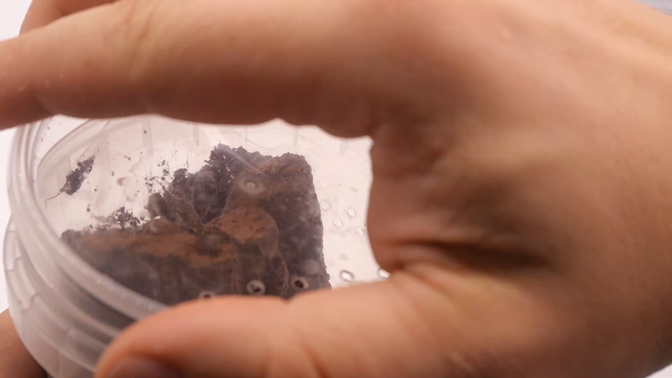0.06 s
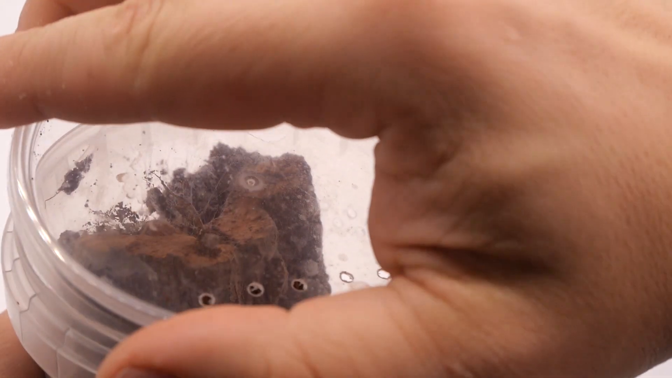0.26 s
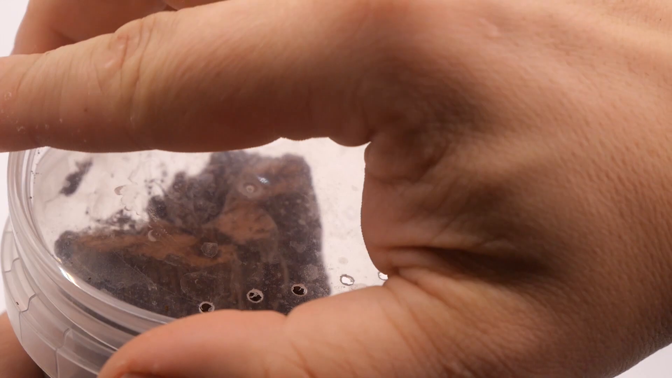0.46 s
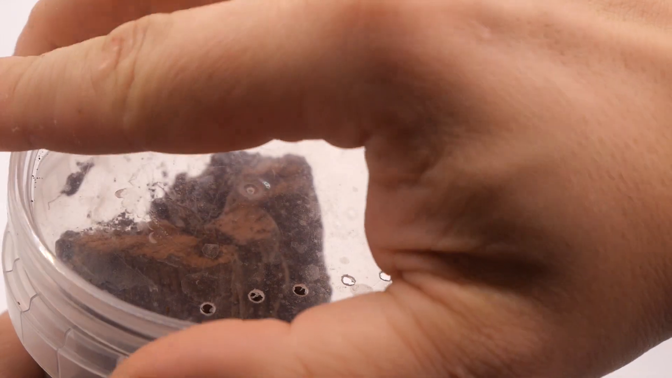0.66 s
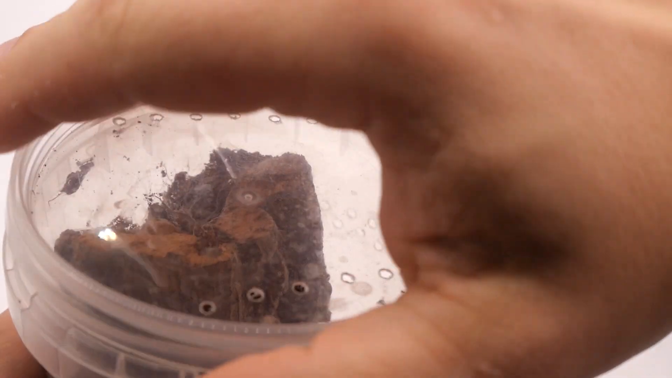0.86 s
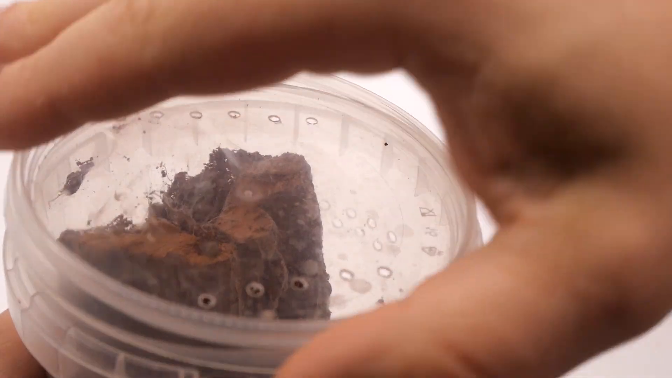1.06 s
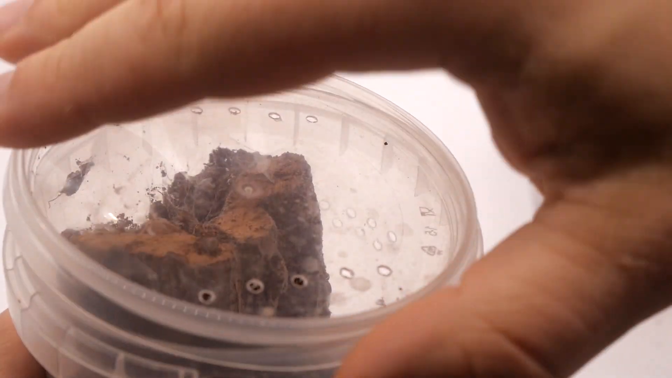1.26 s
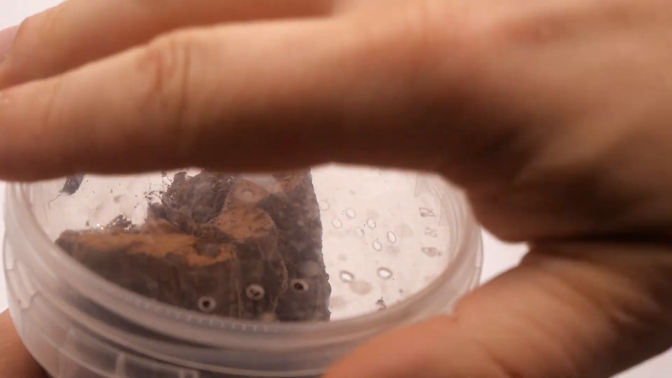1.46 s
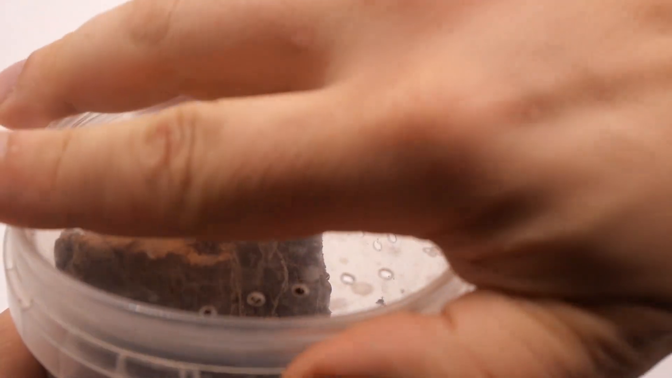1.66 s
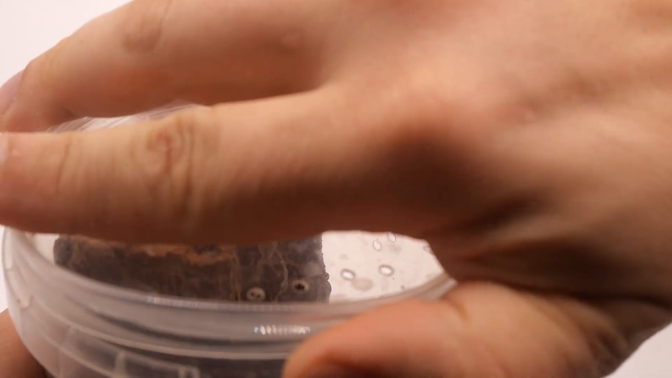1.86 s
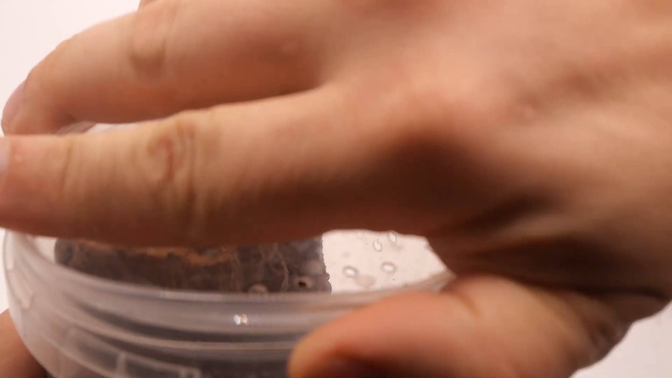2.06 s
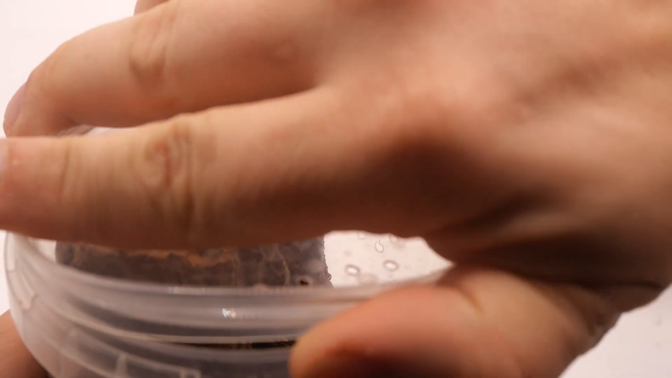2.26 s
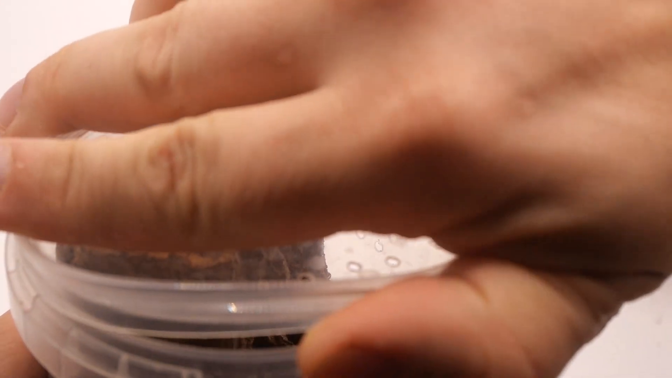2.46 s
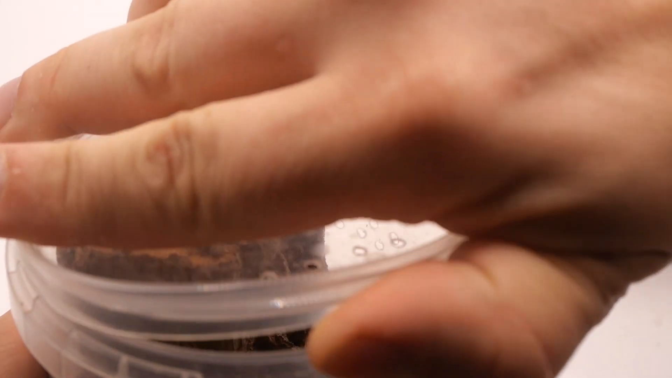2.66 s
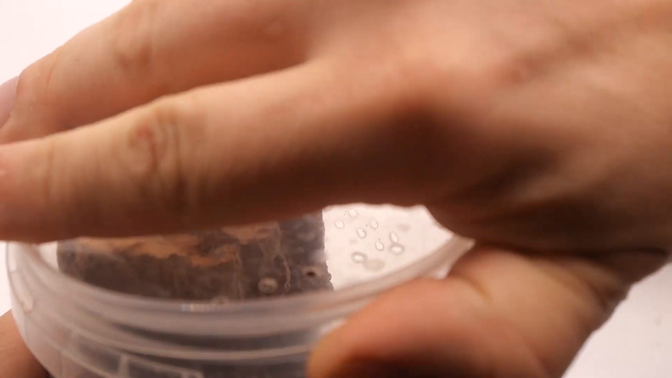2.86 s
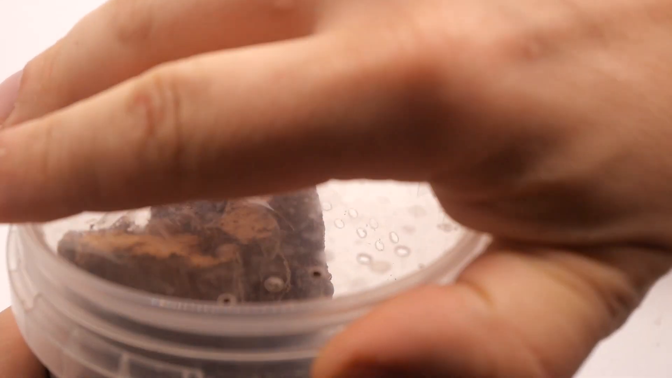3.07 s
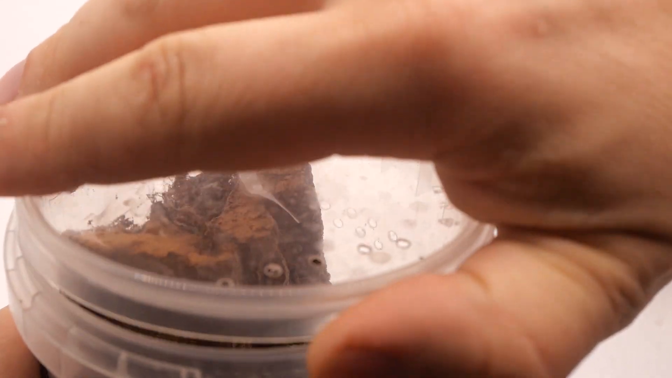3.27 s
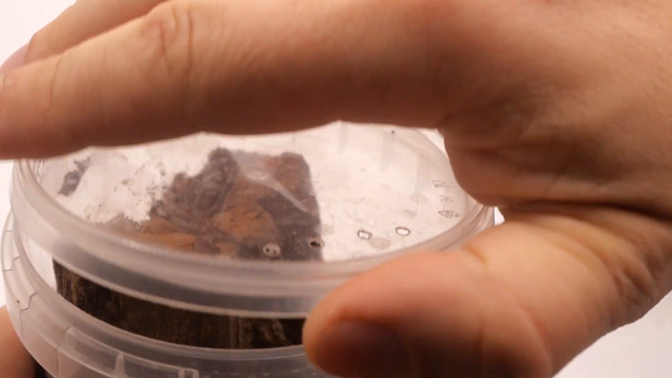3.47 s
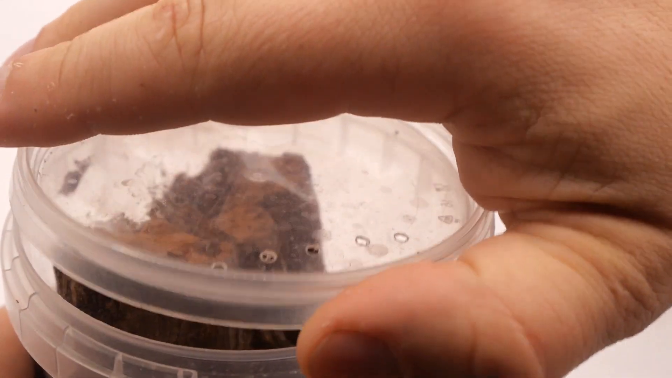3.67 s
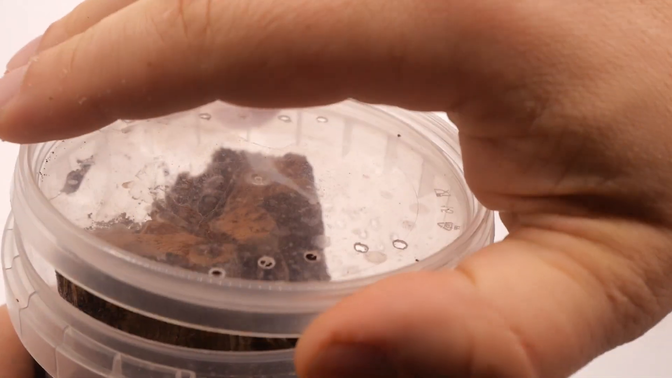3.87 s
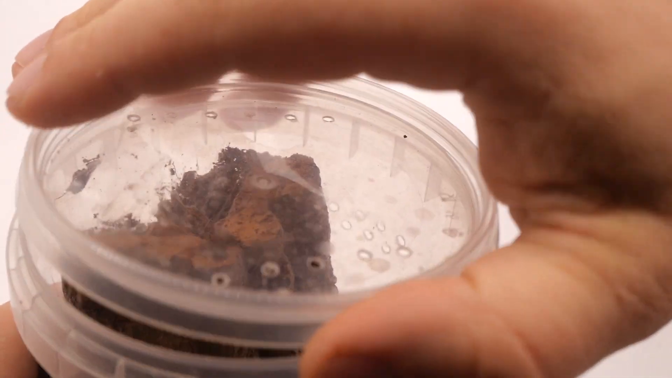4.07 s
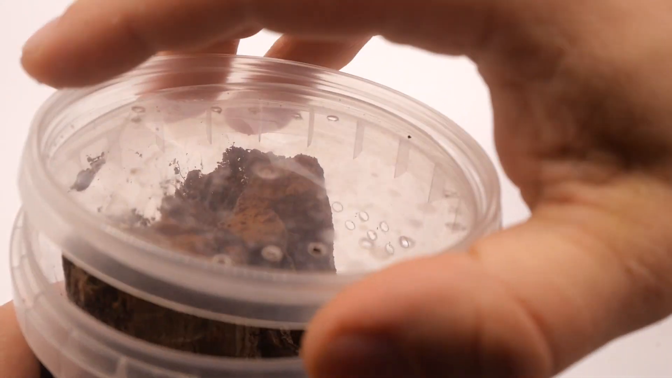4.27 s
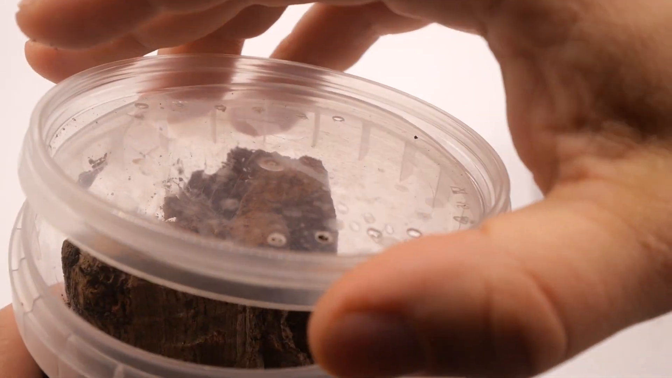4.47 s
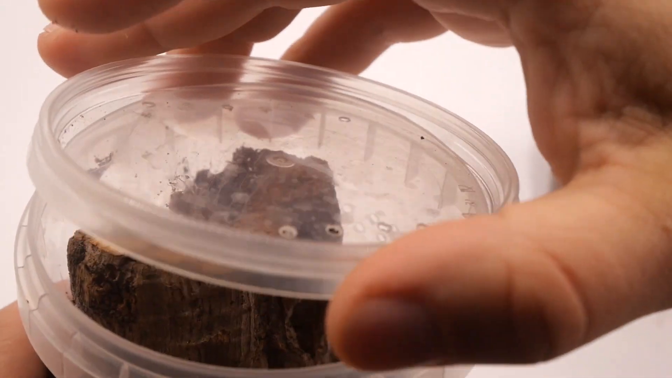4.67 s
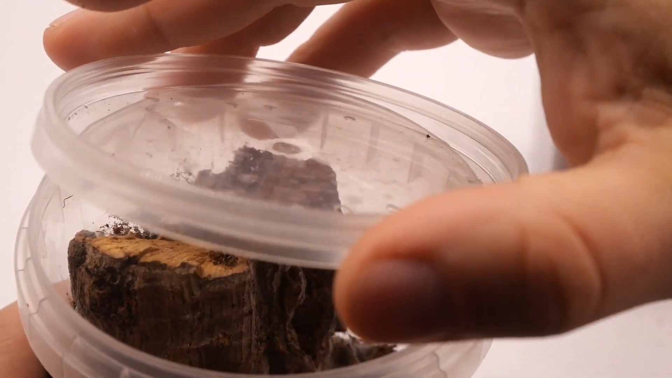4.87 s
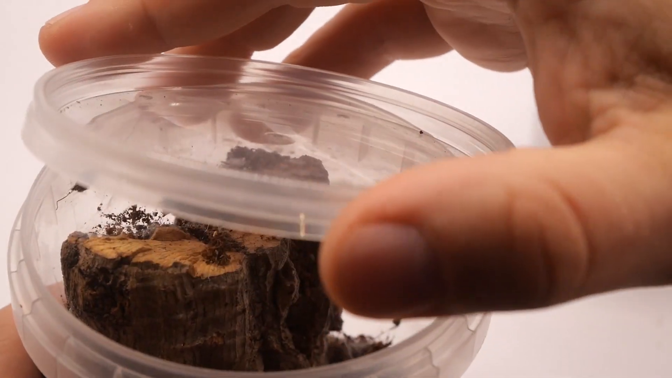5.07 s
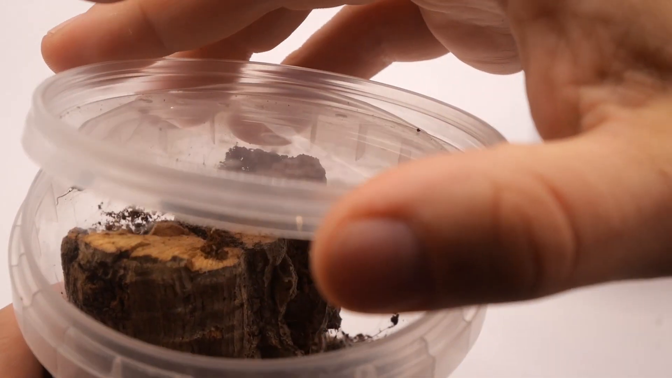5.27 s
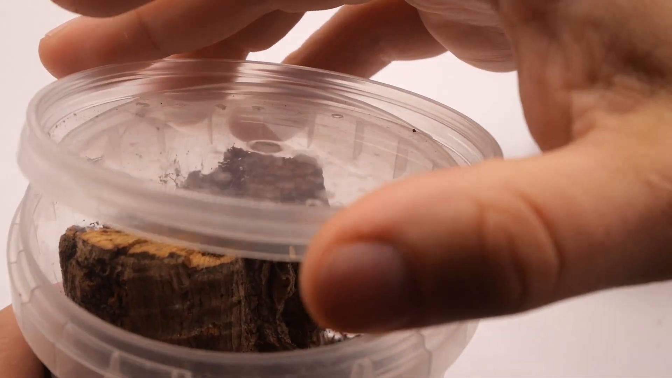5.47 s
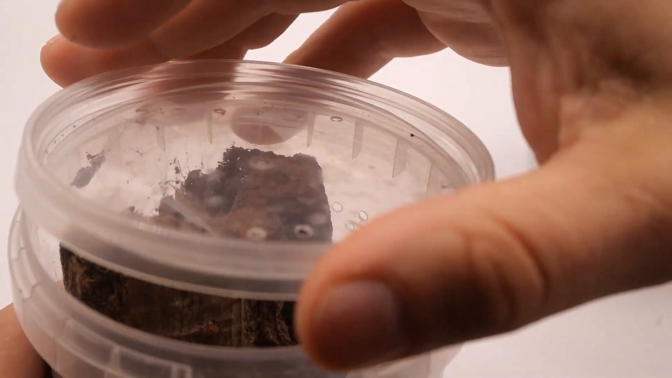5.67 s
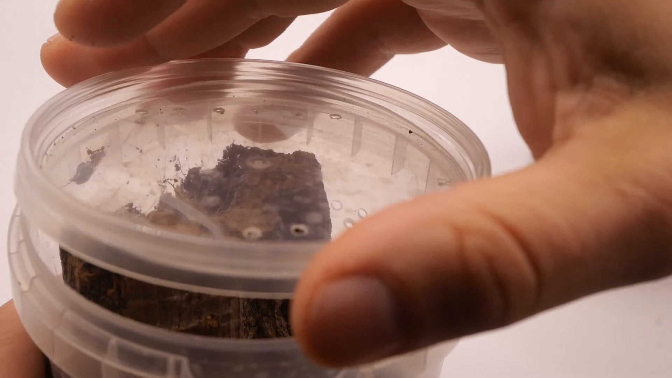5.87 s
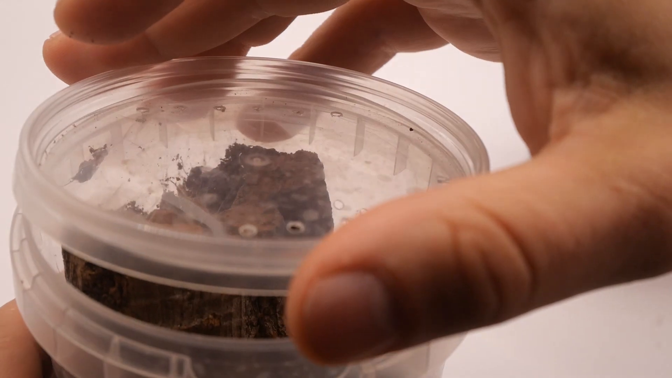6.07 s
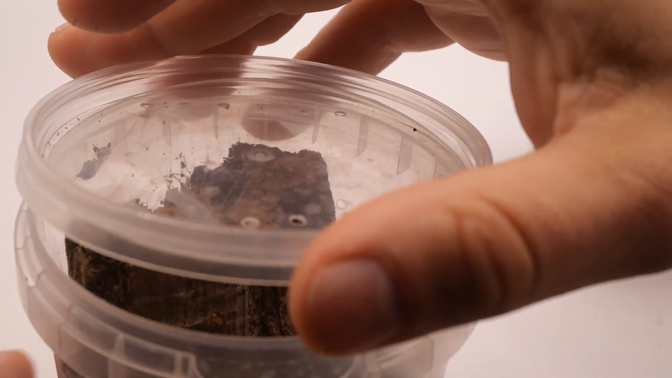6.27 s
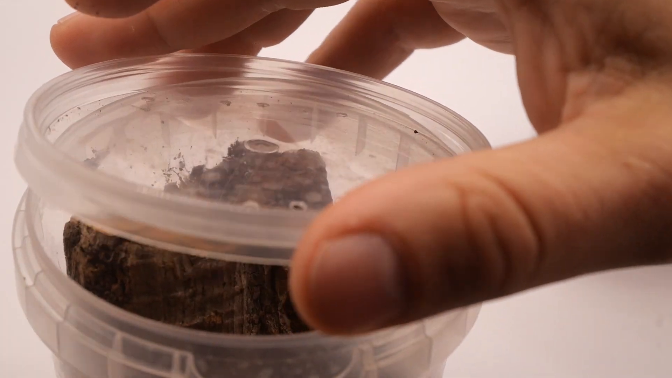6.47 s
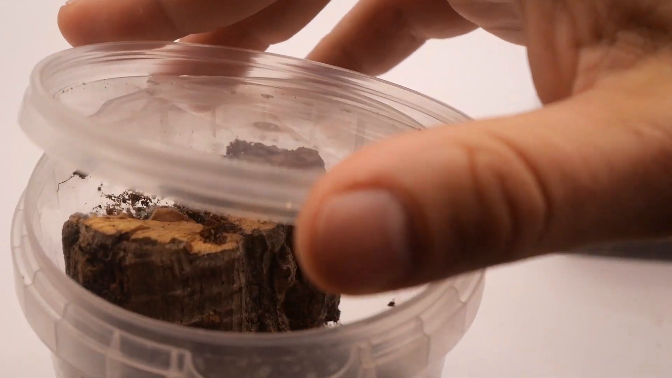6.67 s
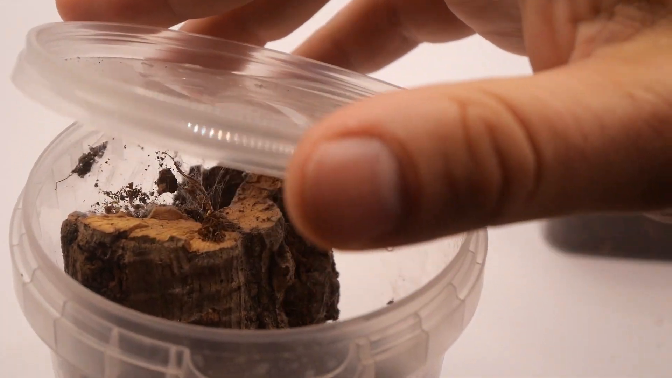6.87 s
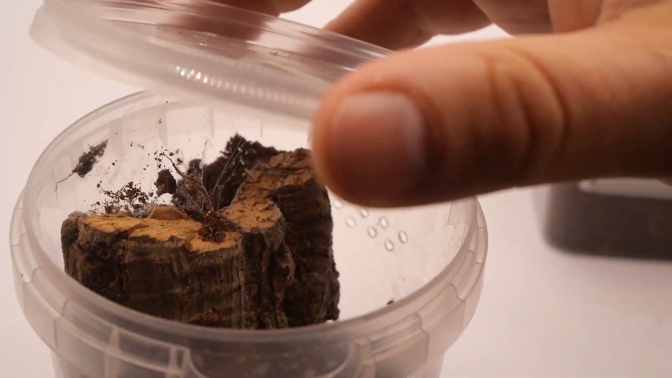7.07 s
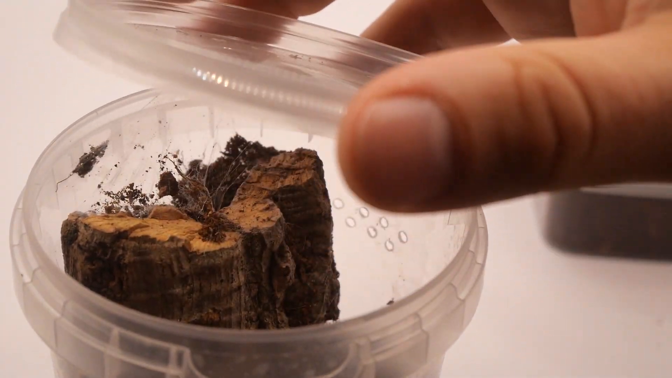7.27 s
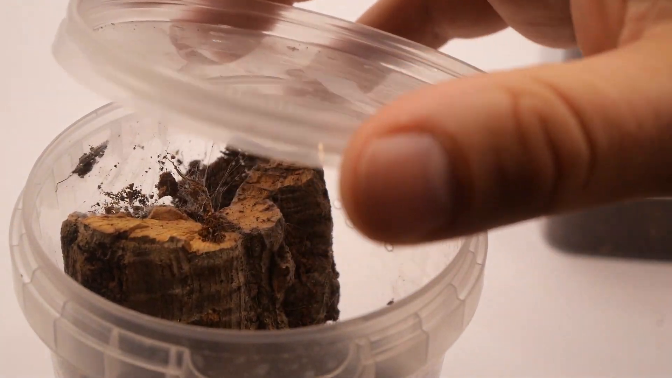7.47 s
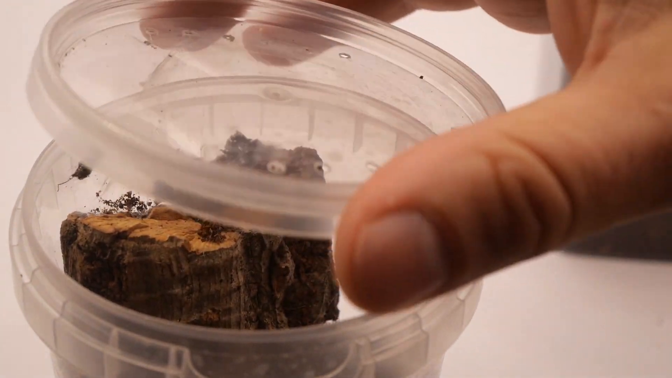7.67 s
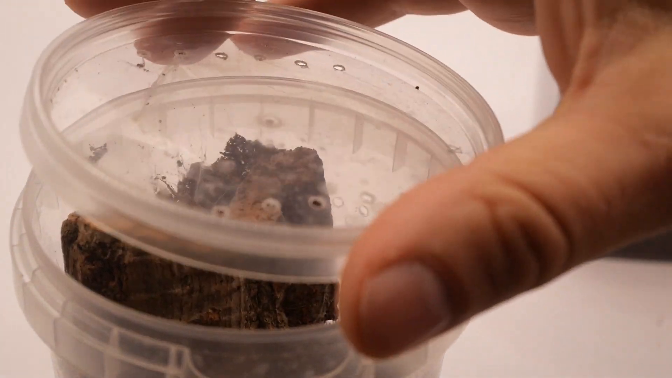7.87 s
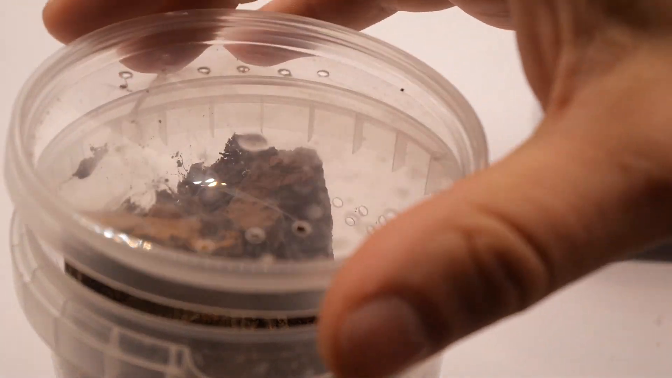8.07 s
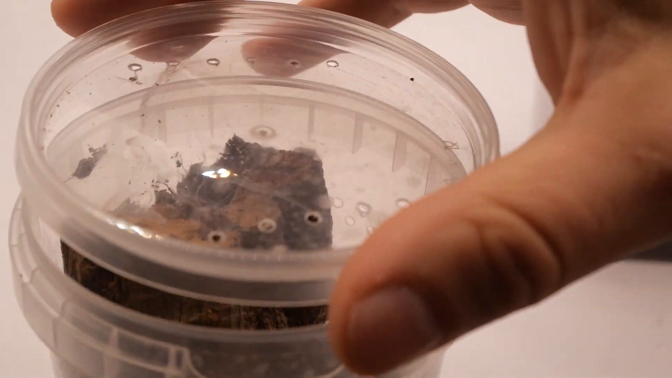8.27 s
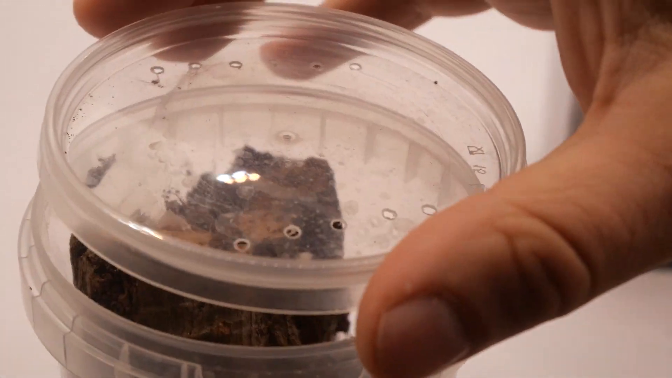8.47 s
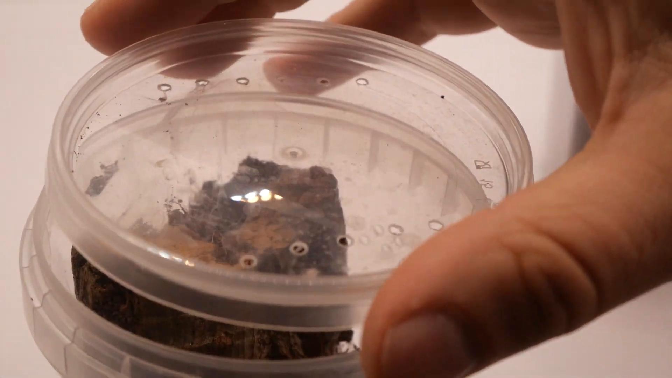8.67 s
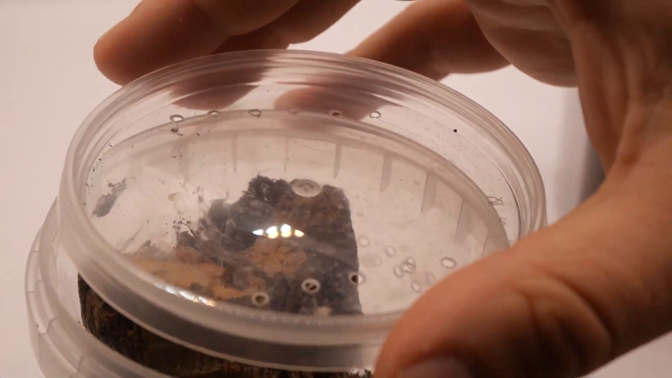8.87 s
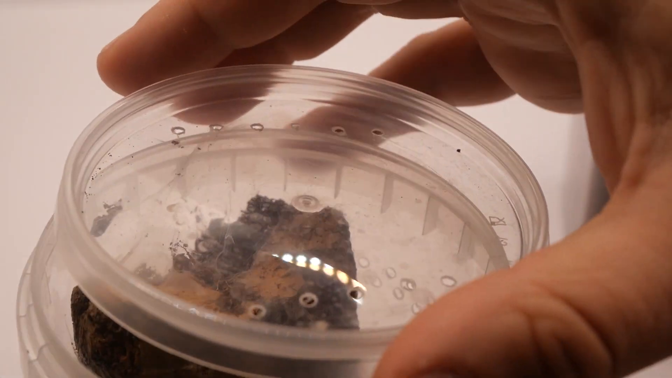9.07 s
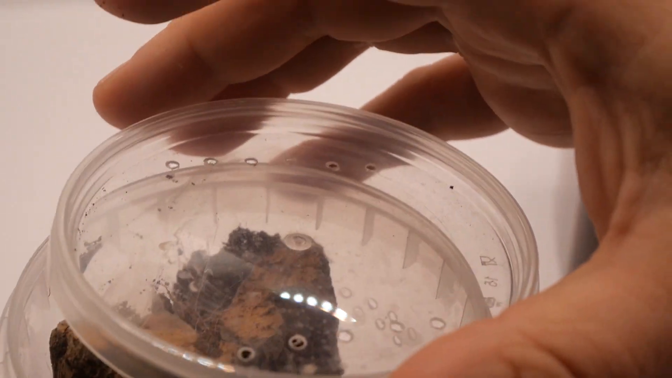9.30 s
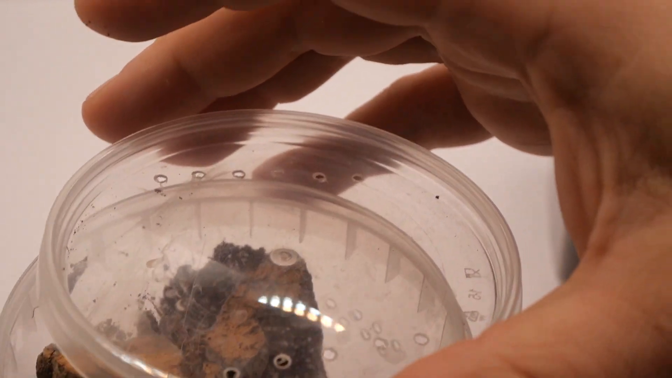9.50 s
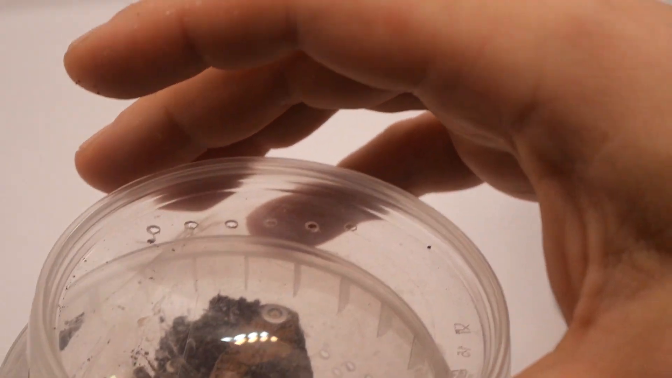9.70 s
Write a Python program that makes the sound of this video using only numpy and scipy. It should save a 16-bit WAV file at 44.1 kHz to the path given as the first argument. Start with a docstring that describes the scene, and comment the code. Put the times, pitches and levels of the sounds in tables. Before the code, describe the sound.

Very close to the microphone in a quiet room, fingers slide and knock on a thin plastic lid with faint rubs and hollow pops. A louder pop comes before the rim breaks free in a rapid cluster of sharp, bright snaps. Afterwards there are only light scuffs, small ticks, low bumps and rustles of the hands.

```python
"""Prising a lid off a cup

A thin plastic lid is prised off a small cup, close to a microphone in a quiet room.
Fingers knock and rub the lid: short damped modes over stick-slip noise exciting its resonances.
Its rim slips over the cup's bead in bursts of sharp snaps, each a swelling and dying set of tones,
and every shift of the hands sways the cup with a low bump and a rustle of filtered noise."""
import sys
import numpy as np
from scipy import signal
from scipy.fft import rfft, irfft, next_fast_len
from scipy.io import wavfile
from scipy.ndimage import map_coordinates

SR = 44100
rng = np.random.default_rng(int(sys.argv[2]) if len(sys.argv) > 2 else 0)


def wav_out(sig):
    """Save sig, one row per channel (or a flat mono array), as 16-bit PCM at SR to the path in sys.argv[1]."""
    wavfile.write(sys.argv[1], SR, np.round(np.clip(np.atleast_2d(sig).T, -1, 1) * 32767).astype(np.int16))


N = 429534

# fingers sliding on the plastic, one continuous curve of effort written in four lists: # t/s, relative level of
# the lid's ring/dB, relative level of the dull skin rub/dB
RUBBING = [
    [(0.0, -60, -61), (0.39, -60, -50), (0.846, -64, -60), (1.004, -59, -52.5), (1.362, -62, -59.5),
     (1.786, -63, -52.5), (1.95, -57.5, -50)],
    [(2.15, -51.5, -46), (2.32, -60.5, -57.5), (3.22, -61.5, -51), (3.58, -55, -50), (3.88, -52, -51.5),
     (4.17, -54.5, -53.5), (4.5, -47, -46.5)],
    [(4.56, -49, -43.5), (4.792, -53, -59), (4.99, -52.5, -53.5), (5.206, -61.5, -59), (5.466, -57, -61.5),
     (6.28, -56.5, -59), (6.42, -55.5, -52.5)],
    [(6.8, -52.5, -45), (7.45, -60.5, -57), (7.99, -58.5, -59.5), (8.35, -52.5, -55.5), (9.04, -65, -59),
     (9.47, -57.5, -55.5), (9.74, -56.5, -47.5)],
]
# resonances of the seated lid: f/Hz, width/Hz, relative level/dB
SEATED_MODES = [(484, 105, -2.5), (930, 230, -1.5), (1143, 142, 6), (1249, 157, 5), (1556, 242, -1.5),
                (3050, 650, -21), (3610, 370, -27), (6100, 2600, -28), (11000, 4400, -31.5)]
# resonances of the loosened lid: f/Hz, width/Hz, relative level/dB
LOOSE_MODES = [(1243, 230, 7.5), (1647, 210, 9.5), (2137, 300, 1.5)]
# upper resonances of the rim: f/Hz, width/Hz, relative level/dB
RIM_MODES = [(2885, 1100, -5), (3680, 530, 5.5), (7070, 1900, -11)]
# jumps of the rim over the bead, with a chatter of small slips before and after: t/s, relative level/dB,
# pitch f/Hz, rim overtone/dB, crack/dB, chatter/dB, run-up/s, run-out/s
RIM_SNAPS = [(3.7065, -4.5, 1480, -11.5, -35, -6.5, 0.0012, 0.0087), (3.7161, -1, 1330, -9, -34, -12, 0, 0),
             (3.7194, -3, 1398, -15.5, -36, -6.5, 0.00089, 0.0045),
             (3.7262, -4.5, 1280, -20, -36.5, -11, 0.0011, .0125),
             (3.752, -4.5, 1527, -23, -48, -7.5, .012, 0), (3.7629, -13, 1650, -30, -49, -13, .004, 0.0013),
             (3.8758, 1, 1700, -4, -10, -30, 0, 0), (3.9664, 4, 1499, -18.5, -15.5, -0.5, 0.017, 0.0027),
             (4.5424, -7.5, 1450, -49, -52, -13.5, .015, .004)]
LIGHT_RUB_DB = -56  # ring level of a light touch, the zero of rubbing effort


def amp(db):
    """Level: decibels to an amplitude ratio."""
    return 10 ** (np.asarray(db) / 20)


def unit(x):
    """Normalisation: scale to rms 1."""
    return x / np.sqrt(np.mean(x ** 2) + 1e-20)


def along(points, hz):
    """Interpolation: read (f/Hz, value) points on a logarithmic frequency axis."""
    f, v = np.transpose(points)
    return np.interp(np.log(hz + 1), np.log(f), v)


def filtered(x, response):
    """Linear filtering: the spectrum of x times a complex response of frequency."""
    m = next_fast_len(len(x) + 8192)  # zero padding for the filter's tail
    spectrum = rfft(x, m) * response(np.fft.rfftfreq(m, 1 / SR))
    return irfft(spectrum, m)[:len(x)]


def coloured(x, spectrum):
    """Spectral shaping: x filtered by a smooth magnitude curve, at rms 1."""
    return unit(filtered(x, lambda f: amp(along(spectrum, f))))


def resonate(x, modes):
    """Modal superposition: x through parallel resonances of alternating sign, at rms 1."""
    def response(f):
        total = 0
        for k, (centre, width, db) in enumerate(modes):
            damping = 1j * f * width
            total = total + (-1) ** k * amp(db) * damping / (centre * centre - f * f + damping)
        return total
    return unit(filtered(x, response))


def wobble(rate):
    """Slow random modulation: a smooth curve through random knots, rate of them a second."""
    knots = rng.standard_normal(int(N * rate / SR) + 4)
    return map_coordinates(knots, [np.arange(N) * rate / SR], order=2)


def friction(rate, spread_db, smooth):
    """Stick-slip: tiny impulses of scattered size, rate of them a second, on an even hiss."""
    slipping = rng.random(N) < rate / SR
    sizes = amp(spread_db * np.minimum(rng.standard_normal(N), 2))
    grains = slipping * rng.choice([-1, 1], N) * sizes
    return unit(grains) + smooth * rng.standard_normal(N)


def swell(t, peak_s):
    """Critically damped response: an envelope that climbs to 1 at peak_s and dies away."""
    return t / peak_s * np.exp(1 - t / peak_s)


def add(track, s, sound):
    """Superposition: mix a sound into the track at time s."""
    part = track[int(s * SR):][:len(sound)]
    part += sound[:len(part)]


def room_tone():
    """Stationary noise: steady rumble and hiss, with a faint hum of narrow noise bands."""
    # background noise: f/Hz, relative level/dB
    background = [(15, -31.5), (25, -4.5), (49, 0), (148, -7.5), (297, -2.5), (552, -9), (722, -23.5),
                  (848, 1.5), (970, -16), (1200, -20), (2490, -20.5), (3630, -24.5), (4870, -22),
                  (14300, -24), (15500, -26.5)]
    # narrow bands of the hum: f/Hz, width/Hz, relative level/dB
    hum_bands = [(296, 10.6, 8), (840, 38, -3), (1216, 45, -1.5)]
    noise = coloured(rng.standard_normal(N), background)
    hum = resonate(rng.standard_normal(N), hum_bands)
    return amp(-57.0) * noise + amp(-63) * hum


def tremor():
    """Amplitude modulation: unsteady hands rumble at random, and more as they work harder."""
    # rumble of the hold: f/Hz, relative level/dB
    rumble = [(15, -23.5), (30, 5.5), (60, -4), (110, -9.5), (250, -29.5), (1000, -72)]
    level_db, growth, swing_db = -59.5, 0.8, 5  # at a light touch; dB per dB of effort; random swing
    s, ring_db, _ = np.vstack(RUBBING).T
    effort_db = np.interp(np.arange(N) / SR, s, ring_db) - LIGHT_RUB_DB
    drive = amp(level_db + growth * effort_db + swing_db * wobble(rate=12))
    return drive * coloured(rng.standard_normal(N), rumble)


def lid_ring(seated, loose):
    """Boundary conditions: power blend of the seated lid's ring with the loosened one's."""
    # how far the lid has come off its seat: t/s, share (0-1)
    freedom = [(3.6, 0.4), (3.9, 1), (4.6, 0.61), (5.099, 0.08), (8, .18), (8.3, 0.47), (8.7, 0.3)]
    free = np.interp(np.arange(N) / SR, *np.transpose(freedom)).clip(0, 1)
    return np.sqrt(1 - free) * seated + np.sqrt(free) * loose


def rubbing():
    """Friction-driven resonance: sliding and brief catches sound the lid, higher as it comes free."""
    # a fingertip briefly catching on the plastic: t/s, relative lid level/dB, swell/s
    catches = [(0.796, -55, .002), (.935, -50, .012), (.964, -47, 0.0019), (1.197, -49, .012),
               (1.397, -43, 0.0016), (1.526, -49.5, 0.012), (2.243, -48, 0.0045), (3.005, -57, 0.012),
               (3.17, -53.5, 0.006), (3.364, -50, 0.0063), (3.44, -51.5, .007), (4.03, -35, .002),
               (4.045, -41.5, .007), (4.124, -39.5, .008), (4.618, -42, 0.0026), (5.602, -45.5, 0.0017),
               (5.963, -44, 0.0023), (6.269, -39, .003), (6.598, -42, .004), (8.103, -39, .002),
               (8.83, -51.5, .015), (9.235, -48, 0.0065), (9.478, -48, 0.0046)]
    # dull rub of the skin: f/Hz, relative level/dB
    skin_colour = [(60, -6), (150, -1), (300, -5.5), (550, -6.5), (800, -9.5), (1200, -16.5), (3000, -34)]
    lid_db, lid_growth = -57, 1.45  # at a light touch; dB per dB of effort
    rim_db, rim_growth = -67, 1
    t = np.arange(N) / SR
    s, *columns = np.vstack(RUBBING).T
    ring_db, skin_db = [np.interp(t, s, c) for c in columns]
    effort_db = ring_db - LIGHT_RUB_DB
    grip = amp(2.45 * wobble(rate=36))
    lid_drive = grip * amp(lid_db + lid_growth * effort_db)
    rim_drive = grip * amp(rim_db + rim_growth * effort_db)
    for s, db, rise in catches:
        catch = swell(t[:SR // 8], rise)
        add(lid_drive, s, amp(db) * catch)
        add(rim_drive, s, amp(db - 18) * catch)
    seated = resonate(friction(rate=1400, spread_db=-0.5, smooth=0.66), SEATED_MODES)
    loose = resonate(friction(rate=310, spread_db=8.0, smooth=0.55), LOOSE_MODES)
    lid = lid_ring(seated, loose)
    rim = resonate(friction(rate=900, spread_db=5.5, smooth=1), RIM_MODES)
    skin = coloured(rng.standard_normal(N), skin_colour)
    return lid_drive * lid + rim_drive * rim + grip * amp(skin_db - 1) * skin


def hands():
    """Forced oscillation: each shift of the grip sways the cup briefly while skin rustles on it."""
    # shifts of the hands: t/s, half length (standard deviation)/s, relative bump level/dB
    bumps = [(0.36, 0.027, -48), (0.65, .013, -54), (1.125, 0.03, -48), (1.409, 0.012, -43.5),
             (2.905, 0.008, -46), (3.389, 0.059, -51.5), (4.109, 0.039, -46.5), (4.844, 0.027, -43),
             (5.558, 0.031, -41), (5.854, 0.013, -41.5), (6.293, 0.039, -43), (6.466, 0.017, -24),
             (6.707, 0.054, -38.5), (7.038, 0.027, -38), (7.315, .015, -48), (7.732, 0.035, -47.5),
             (8.408, 0.027, -37.5), (8.703, 0.014, -43.5), (9.108, 0.022, -39)]
    # rustle of the skin: f/Hz, relative level/dB
    rustle_colour = [(40, 8), (130, -2.5), (300, -2.5), (650, -7), (1200, -9.5), (1700, -13), (2300, -22),
                     (3700, -23.5), (5000, -29), (9000, -30.5), (15500, -35)]
    sway_hz, sway_db = 39.3, 5  # mean pitch of the held cup; gain
    rustle_db, rustle_growth = -20.5, 0.5  # at a 0 dB bump; dB per dB of bump
    sway, rustle = np.zeros((2, N))
    t = np.arange(-SR // 6, SR // 6) / SR
    for s, half, db in bumps:
        push = np.exp(-(t / half) ** 2 / 2)
        hz = sway_hz * (1 + 0.24 * rng.normal())
        swing = np.cos(2 * np.pi * hz * t + rng.uniform(-np.pi, np.pi))
        add(sway, s + t[0], amp(db + sway_db) * push * swing)
        add(rustle, s + t[0], amp(rustle_db + rustle_growth * db) * push)
    return sway + rustle * coloured(friction(rate=2500, spread_db=2.5, smooth=0.6), rustle_colour)


def knocks():
    """Damped flexural modes: the lid's skin pops, its rim ticks, and the cup thuds and shivers on."""
    # the lid's skin flexing under a finger, or at low pitch the cup's body thudding: t/s, relative level/dB,
    # pitch f/Hz, relative rim tick/dB
    hits = [(0.828, -38, 560, -70), (0.8775, -31.5, 548, -50.5), (1.1228, -23, 478, -36.5),
            (1.7375, -18.5, 564, -42), (1.762, -36, 176, -54), (1.809, -39.5, 145, -65),
            (1.863, -25, 156, -40.5), (1.8639, -25.5, 1310, -32), (1.879, -32, 2270, -50),
            (1.886, -49, 165, -51), (2.582, -24, 584, -28.5), (2.5912, -24.5, 566, -36.5),
            (2.6006, -3.5, 583, -19.5), (4.933, -32.5, 414, -53), (5.9196, -28.5, 560, -38.5),
            (6.013, -31.5, 579, -53), (6.1372, -28.5, 617, -41.5), (6.141, -33.5, 236, -45),
            (6.446, -26.5, 555, -31.5), (6.466, -24, 177, -42), (8.3832, -31.5, 2010, -35),
            (8.386, -28.5, 700, -51), (8.412, -31, 560, -49)]
    rise_s, rise_hz, slowing = 0.0041, 542, 0.64  # swell at this pitch; lower flexes swell more slowly
    cup_hz, cup_db = 290, -14  # the cup's thud, against the knock
    contact_db, contact_growth = -28, 0.57  # finger scuff at a 0 dB knock; dB per dB of knock
    out, t = np.zeros(N), np.arange(SR // 4) / SR
    tick = resonate(rng.standard_normal(N), [
        (1400, 240, 2), (3230, 460, 2.5), (3754, 240, 5.5), (6830, 1800, -11.5), (10800, 1500, -19)])
    shiver = coloured(rng.standard_normal(N), [
        (80, -26), (200, -6.5), (320, -2.0), (520, -2.0), (950, -7.5), (1600, -10.0),
        (2200, -30), (3800, -31.0), (8000, -43.0)])
    scuff = coloured(rng.standard_normal(N), [
        (70, -40), (170, -9), (380, -5), (850, 7.5), (1500, -17), (2200, -23), (5000, -28)])
    for s, db, hz, tick_db in hits:
        rise = rise_s * (rise_hz / hz) ** slowing
        here = slice(int(s * SR), int(s * SR) + len(t))
        flex = t / rise * np.exp((1 - (t / rise) ** 2) / 2)  # the finger stops the swing early
        skin = (np.sin(2 * np.pi * hz * t) + amp(-14) * shiver[here]) * flex
        cup = amp(cup_db) * np.sin(2 * np.pi * cup_hz * t) * swell(t, rise * 1.2)
        tail = amp(-20.5) * shiver[here] * np.minimum(t / rise, 1) * amp(-60 * t / 0.17)
        contact = amp(contact_db + contact_growth * db) * scuff[here] * swell(t, rise * 1.3)
        rim = amp(tick_db - 5.5) * tick[here] * swell(t, rise * 0.73)
        add(out, s, amp(db) * (skin + cup + tail) + contact + rim)
    return out


def walls(x):
    """Reverberation: convolution with a decaying noise tail, duller as it fades."""
    # decay of the room: f/Hz, t60/s
    decay = [(200, 0.44), (1200, 0.154), (4000, 0.096), (12000, 0.083)]
    hz, t, z = signal.stft(rng.standard_normal(SR // 2), SR, nperseg=256)
    faded = z * amp(-60 * t / along(decay, hz)[:, None])
    tail = signal.istft(faded, SR, nperseg=256)[1]
    return signal.fftconvolve(x, unit(tail) / np.sqrt(len(tail)))[:N]


def scrapes():
    """Stick-slip excitation: the rim judders along the cup in strokes that rise fast and decay."""
    # the rim dragging along the cup: t/s, relative lid level/dB, rise/s, t60/s, relative dull thud/dB
    strokes = [(1.993, -21, 0.013, 0.24, -39), (3.704, -25, .006, 0.25, -40),
               (4.3511, -30, 0.0028, .07, -42), (4.434, -31.5, .004, 0.13, -39.5),
               (6.239, -42, 0.0044, 0.26, -46), (6.432, -39, 0.018, 0.15, -19.5),
               (6.505, -44, 0.004, 0.087, -29), (6.554, -38.5, .003, 0.097, -32.5),
               (6.641, -33, .003, .16, -37.5), (6.717, -32.5, 0.028, 0.11, -32.5),
               (8.382, -41, .004, .12, -53)]
    # long-ringing modes of the cup wall: f/Hz, width/Hz, relative level/dB
    wall_modes = [(1274, 35, 0), (1150, 33, -9)]
    t = np.arange(SR // 2) / SR
    drag, thud = np.zeros((2, N))
    for s, db, rise, t60, thud_db in strokes:
        stroke = np.minimum(t / rise, 1) * amp(-60 * np.maximum(t - rise, 0) / t60)
        add(drag, s, amp(db) * stroke)
        add(thud, s, amp(thud_db) * stroke)
    edge = amp(-15.5) * drag + amp(-22) * thud  # both sound the rim
    judder = friction(rate=1800, spread_db=0.5, smooth=0.34)
    dull = coloured(rng.standard_normal(N), [
        (30, -2.0), (80, 7.5), (135, -4), (195, 4.5), (350, -21), (600, -16.5),
        (1200, -32.5), (4000, -46.0)])
    wall = resonate(rng.standard_normal(N), wall_modes)
    seated = resonate(judder, SEATED_MODES) + amp(-10.5) * wall
    loose = resonate(friction(rate=380, spread_db=2, smooth=0.35), LOOSE_MODES)
    return drag * lid_ring(seated, loose) + edge * resonate(judder, RIM_MODES) + thud * dull


def creep():
    """Accelerating slip: just before each snap the strained rim creaks, swelling into the jump."""
    growth_s, level_db, rim_db = 0.0039, -27, -5.5  # shortest growth time; level against snap; overtones
    drive, t = np.zeros(N), np.arange(-SR // 16, SR // 16) / SR
    for s, db, *_, run_up, run_out in RIM_SNAPS:
        growth = np.exp(-np.abs(t) / (growth_s + run_up / 2))
        release = 1 / (1 + np.exp(t / 0.0031))
        add(drive, s + t[0], amp(db + level_db) * growth * release)
    grains = friction(rate=1200, spread_db=9, smooth=0.6)
    return drive * (resonate(grains, LOOSE_MODES) + amp(rim_db) * resonate(grains, RIM_MODES))


def slips():
    """Relaxation oscillation: each snap and its fading chatter, as (s, dB, pitch Hz, rim dB, crack dB)."""
    gap_s, jitter = 0.0026, 0.11  # time between small slips; its scatter as a share of the gap
    fade_db, scatter_db, detuning = 9.5, 0.5, 0.043  # loss by the end of a run; scatter of size and pitch
    small_rim_db, small_crack_db = 2, -15  # a small slip's overtone and crack, against the snap's overtone
    steps = np.arange(-8, 9)
    chance = rng.standard_normal((len(RIM_SNAPS), len(steps), 3))
    for snap, draws in zip(RIM_SNAPS, chance):
        s, db, hz, rim_db, crack_db, chatter_db, run_up, run_out = snap
        yield s, db, hz, rim_db, crack_db
        for k, (late, size, detune) in zip(steps, draws):
            run = run_up if k < 0 else run_out
            away = abs(k) * gap_s / max(run, 1e-9)  # 1 at the end of the run
            if 0 < away < 1:
                fade = scatter_db * size - fade_db * away
                yield (s + (k + jitter * late) * gap_s, chatter_db + fade, hz * (1 + detuning * detune),
                       rim_db + small_rim_db + fade / 2, rim_db + small_crack_db + fade / 2)


def snaps():
    """Impulsive modal excitation: each slip over the bead kicks lid, rim and longer-ringing cup wall."""
    wall_hz, coupling_hz = 1268, 110  # the wall rings less the further a slip's pitch lies from its own
    out, t = np.zeros(N), np.arange(SR // 6) / SR
    hiss = coloured(rng.standard_normal(N), [
        (300, -15.0), (2500, 6.5), (5400, -1), (7200, 1), (8300, -11), (11500, -7), (15500, -27)])
    shell = coloured(rng.standard_normal(N), [
        (150, -38.5), (320, -4), (520, 6.5), (900, 5.5), (1300, -11), (2100, 3.0),
        (2700, -29), (6000, -34.5)])
    for s, db, hz, rim_db, crack_db in slips():
        here = slice(int(s * SR), int(s * SR) + len(t))
        lid = amp(db) * np.cos(2 * np.pi * hz * t) * swell(t, 0.00084)
        upper = amp(db - 18) * np.sin(2 * np.pi * 1.3 * hz * t) * swell(t, 0.0008)  # the lid's second mode
        flex = amp(db - 13.5) * shell[here] * swell(t, 0.00063)  # the shell's many damped modes
        bend = 2 * np.pi * t * (1 + 0.018 * rng.normal())  # the rim's tension differs from slip to slip
        high = np.sin(3760 * bend) * swell(t, 0.00075)
        low = amp(-0.5) * np.sin(3380 * bend) * swell(t, 0.00054)
        rim = amp(rim_db - 3.5) * (high + low)
        crack = amp(crack_db + 2.5) * hiss[here] * swell(t, 0.00038)
        coupling = 1 / np.hypot(1, (hz - wall_hz) / coupling_hz)
        wall = amp(db - 23.5) * coupling * np.sin(2 * np.pi * wall_hz * t) * amp(-60 * t / 0.12)
        add(out, s - 0.0003, lid + upper + flex + rim + crack + wall)
    return out


def scene():
    """Superposition: lid, hands and room summed at one microphone."""
    snap, knock = snaps(), knocks()
    echo = walls(amp(-26.0) * snap + amp(-29.5) * knock)
    handling = tremor() + rubbing() + hands()
    return (room_tone() + handling + knock + echo + scrapes() + creep() + snap)[None]


def record(dry):
    """Gain reduction: loud peaks duck the gain, which then recovers; the rest clips, then is band-limited."""
    x, t = dry[0], np.arange(N) / SR
    level_db = 20 * np.log10(np.abs(x) + 1e-9)
    over_db = np.clip(0.96 * (level_db + 3), 0, 9)  # threshold -3 dB, at most 9 dB of ducking
    recovery = 55 * t  # dB, at 55 dB a second
    held_db = np.maximum.accumulate(over_db + recovery) - recovery
    pole = np.exp(-1 / (0.032 * SR))  # smoothing over 32 ms
    duck_db = signal.lfilter([1 - pole], [1, -pole], held_db)
    clipped = np.clip(x * amp(-duck_db), -1, 1)
    return filtered(clipped, lambda hz: hz < 15750)[None]


dry = scene()
out = record(dry)
wav_out(out)
```